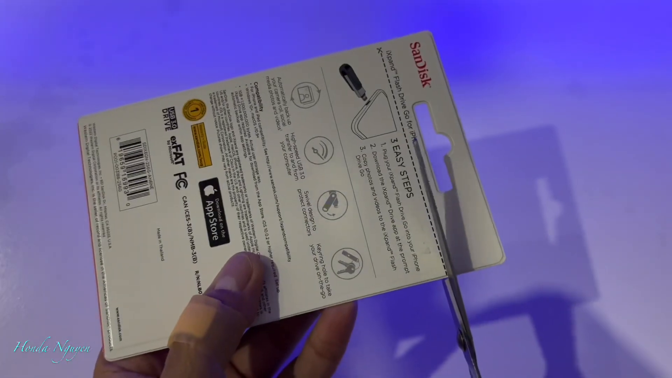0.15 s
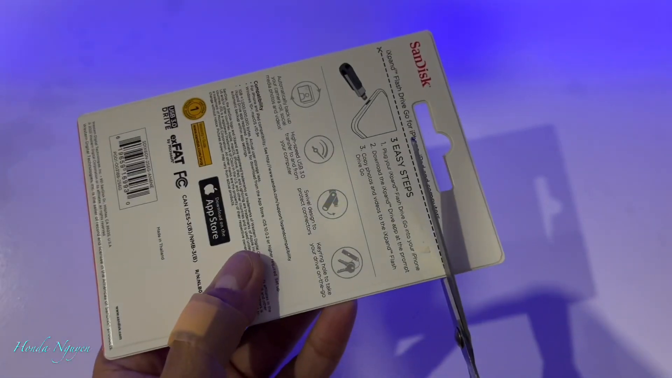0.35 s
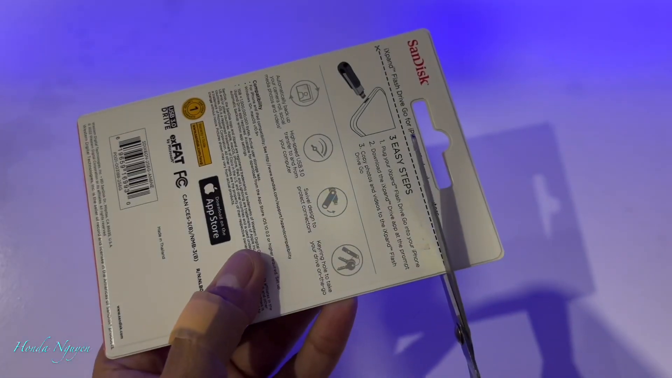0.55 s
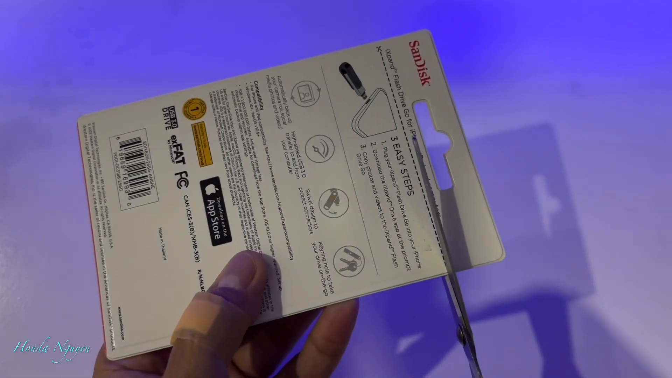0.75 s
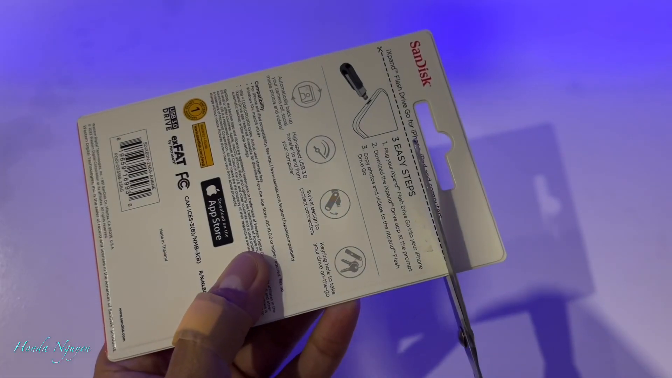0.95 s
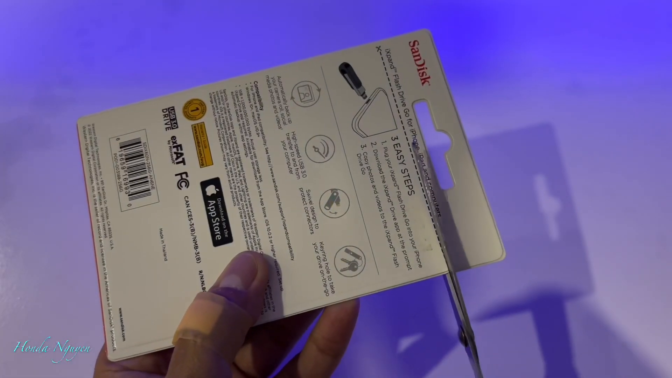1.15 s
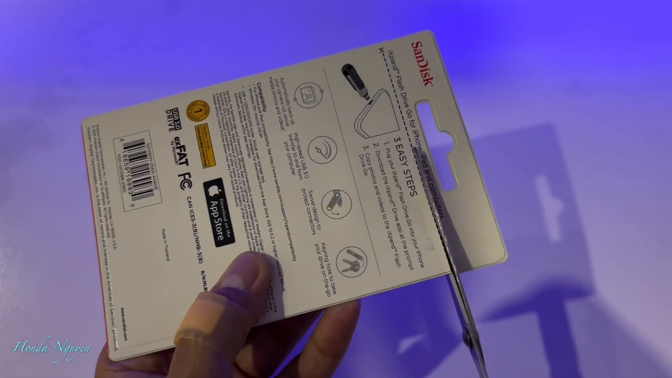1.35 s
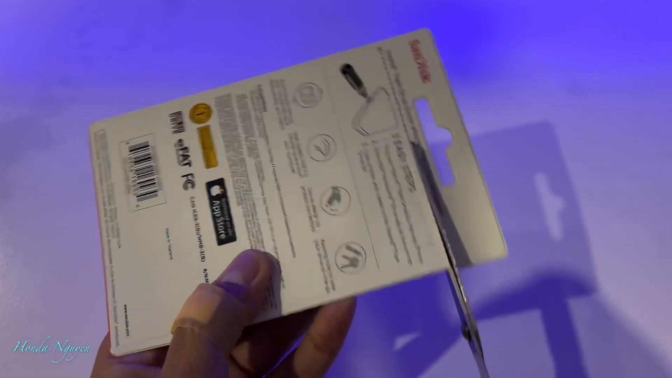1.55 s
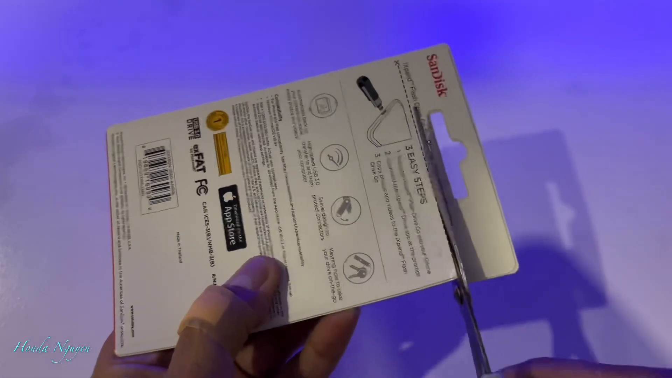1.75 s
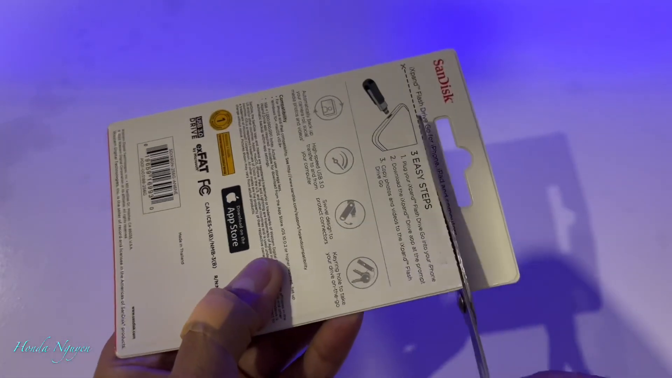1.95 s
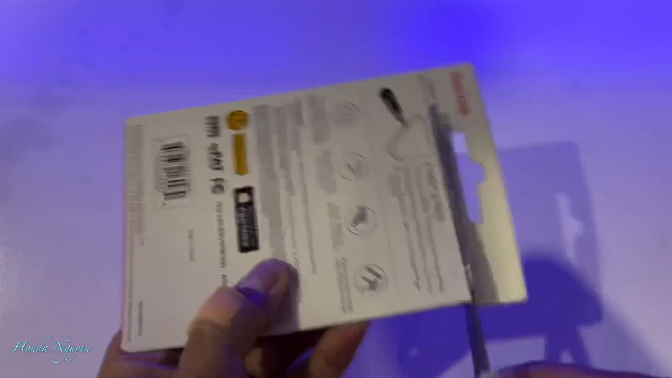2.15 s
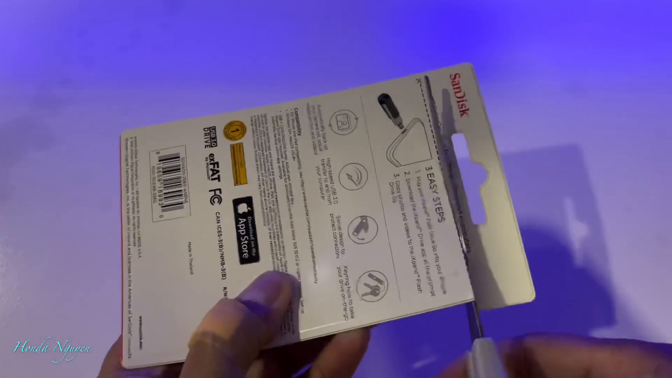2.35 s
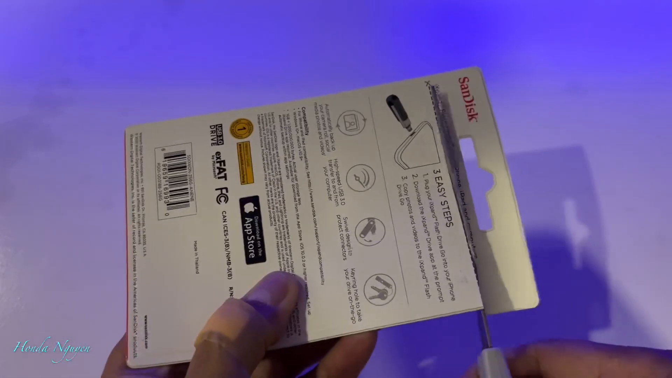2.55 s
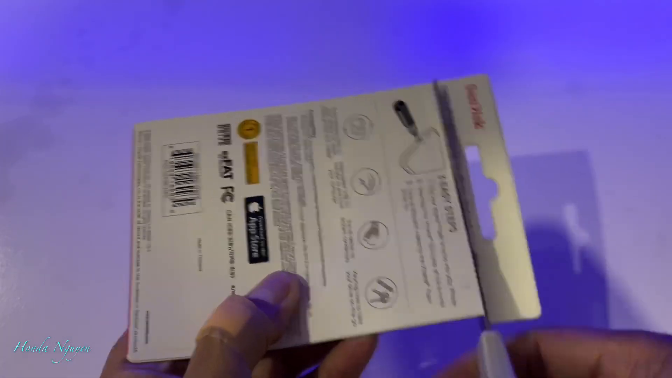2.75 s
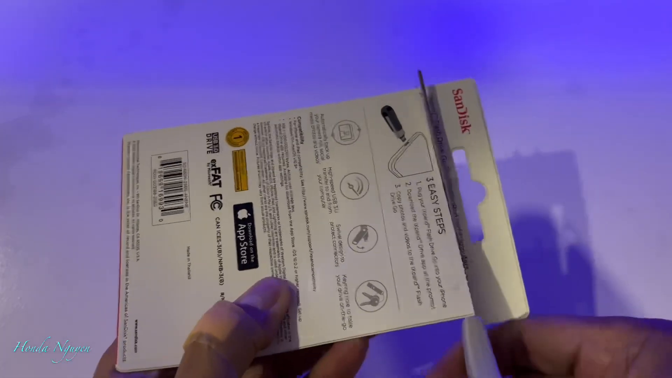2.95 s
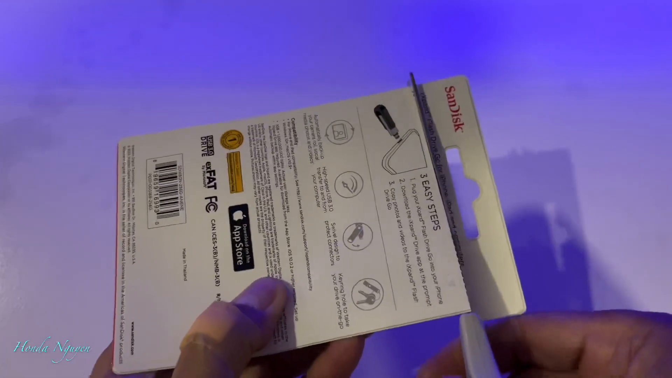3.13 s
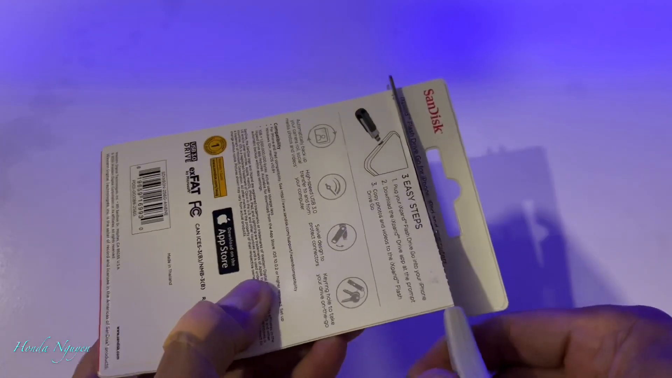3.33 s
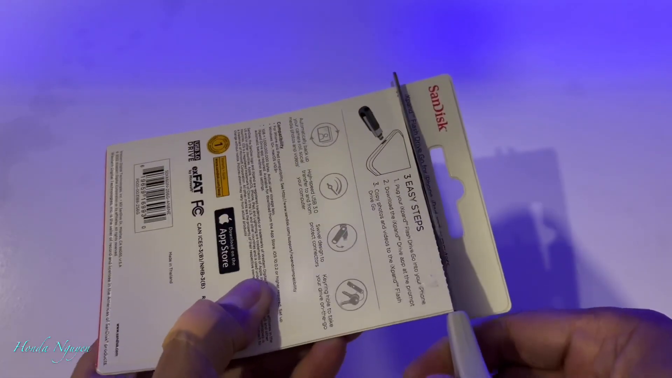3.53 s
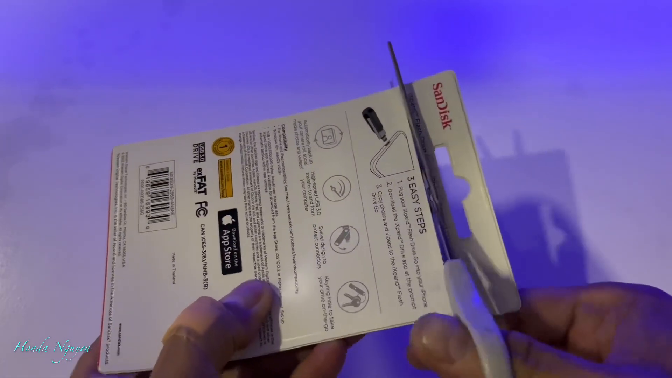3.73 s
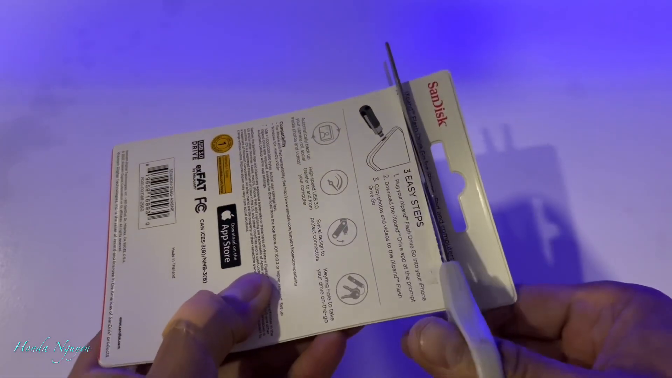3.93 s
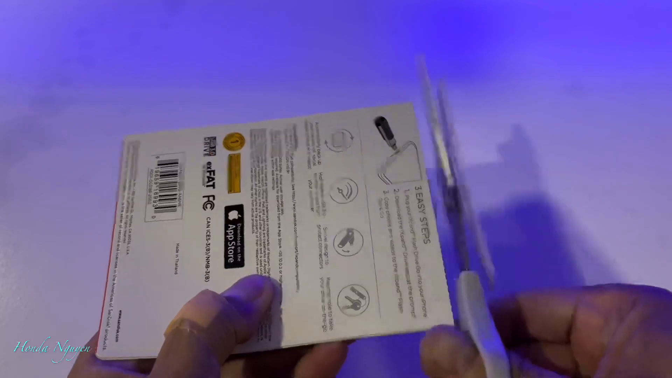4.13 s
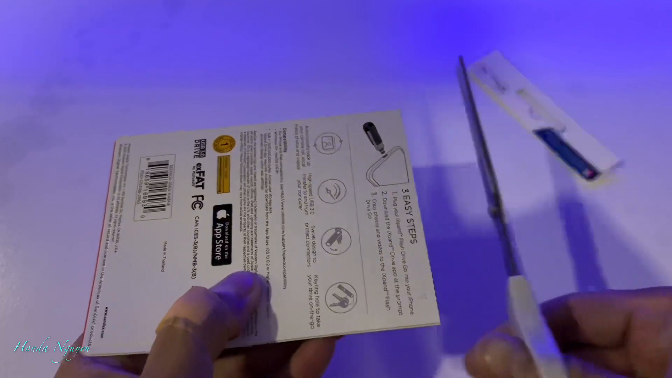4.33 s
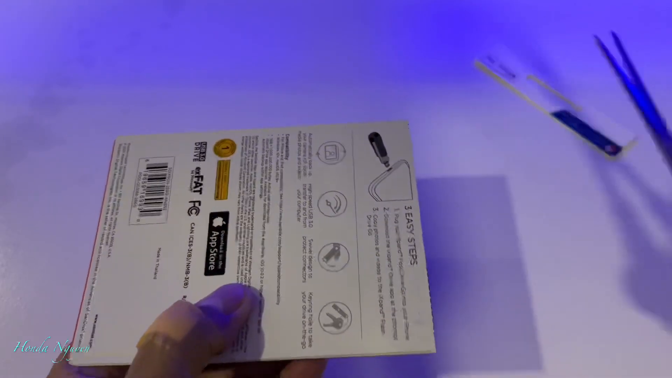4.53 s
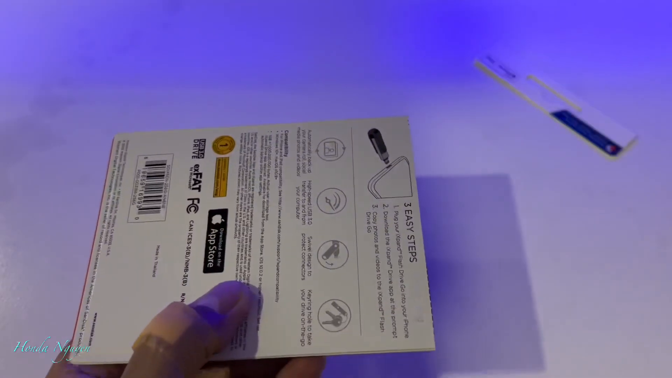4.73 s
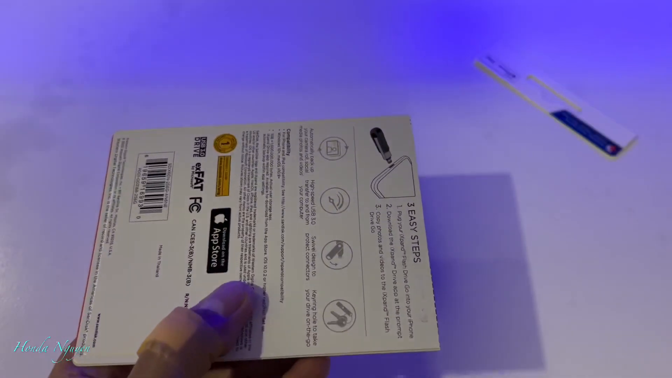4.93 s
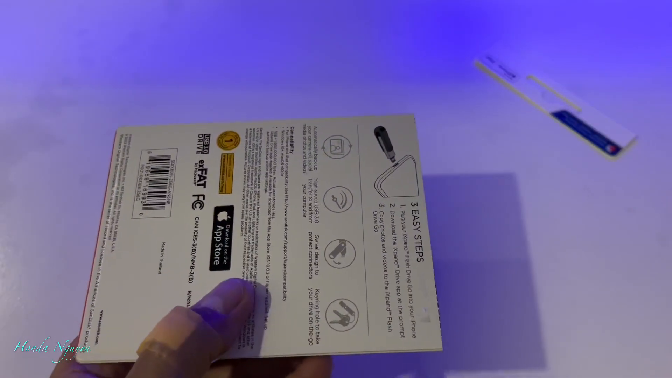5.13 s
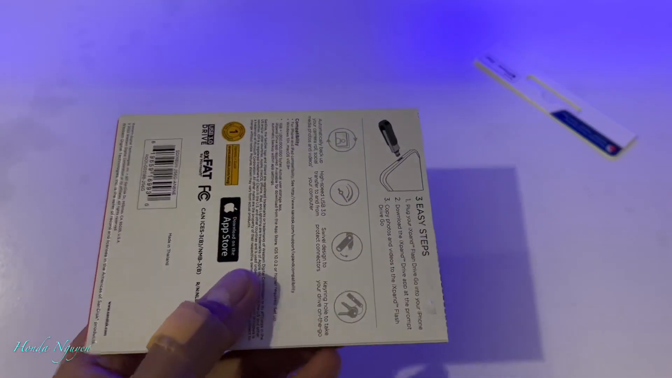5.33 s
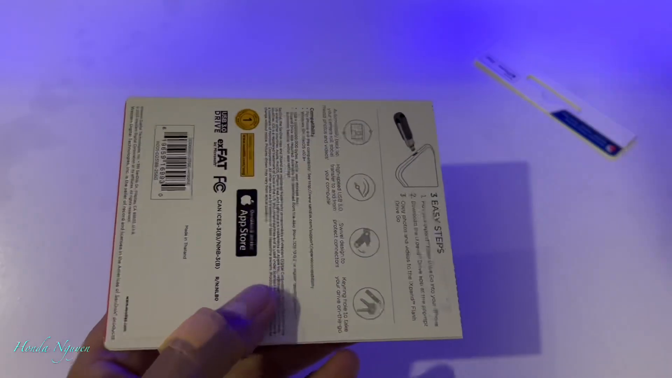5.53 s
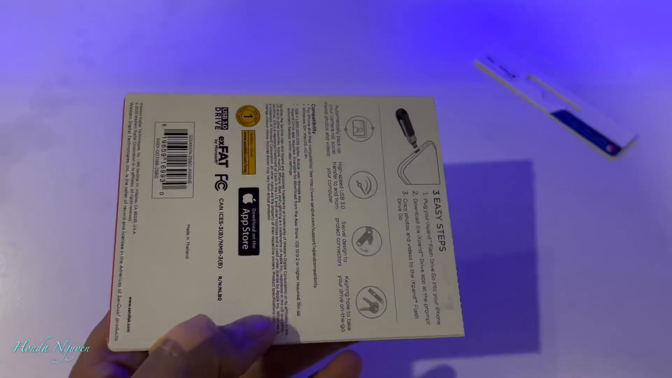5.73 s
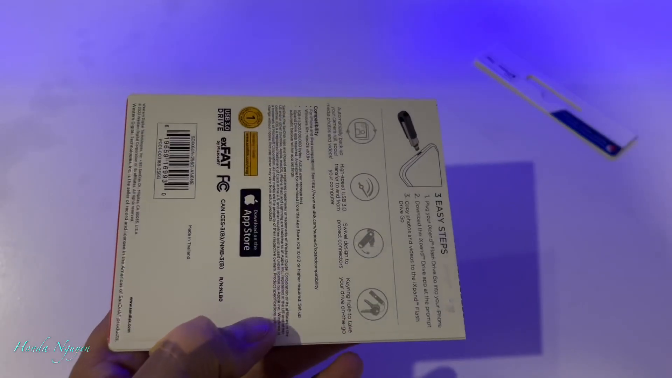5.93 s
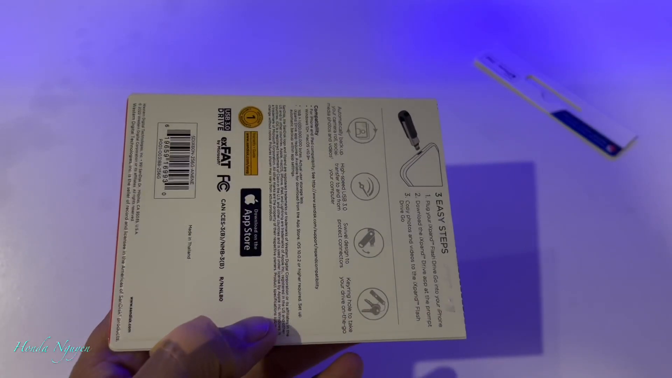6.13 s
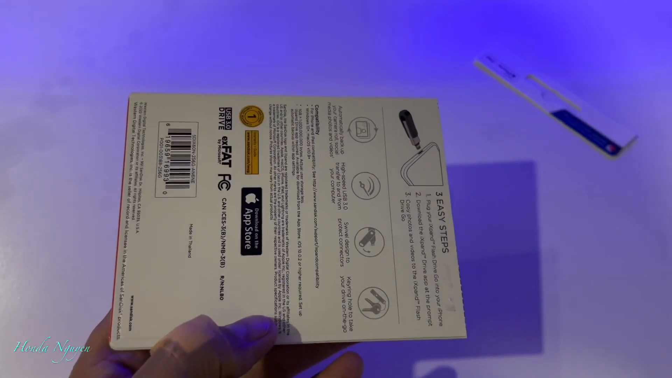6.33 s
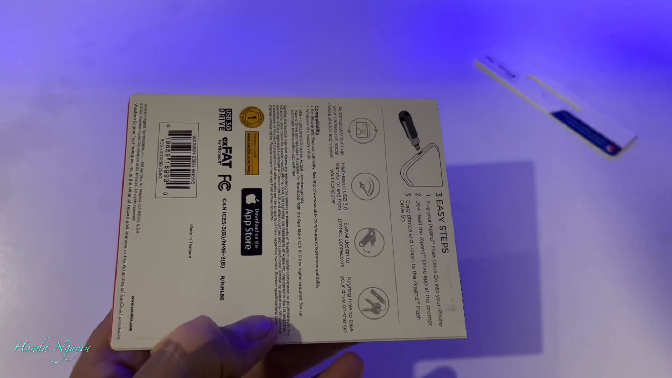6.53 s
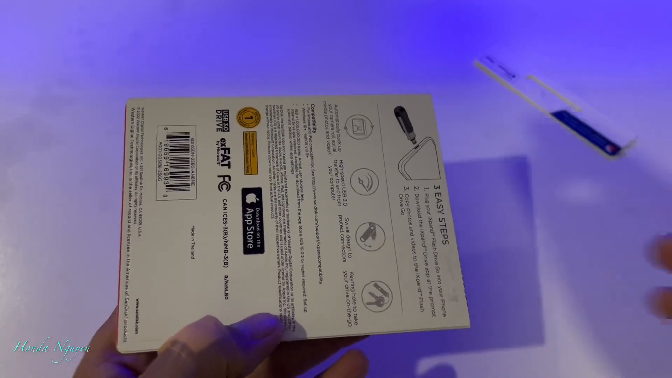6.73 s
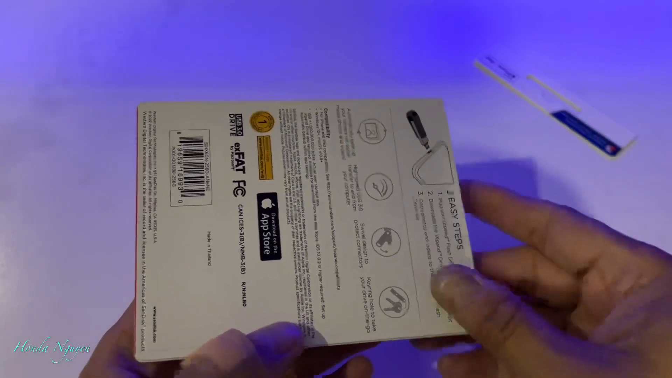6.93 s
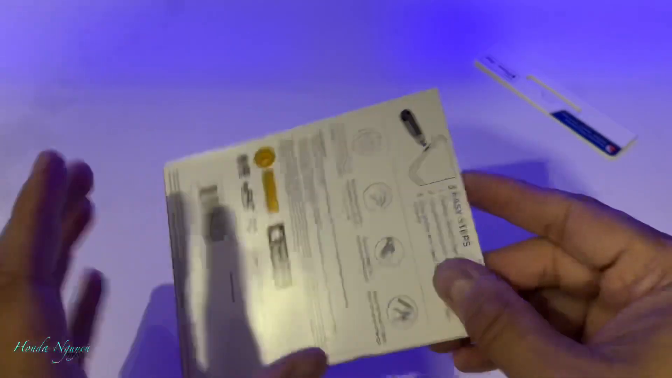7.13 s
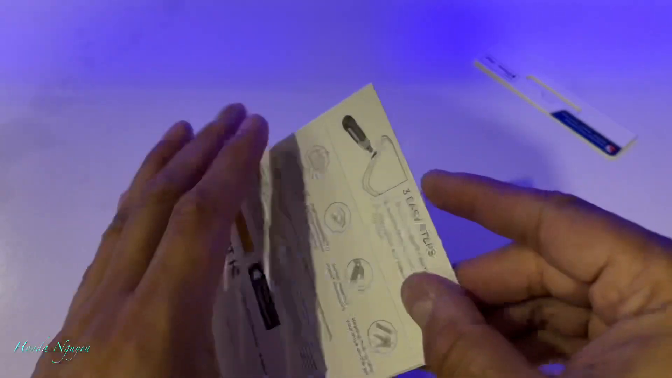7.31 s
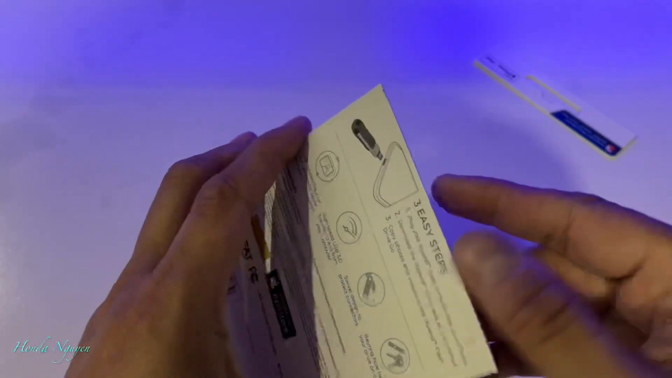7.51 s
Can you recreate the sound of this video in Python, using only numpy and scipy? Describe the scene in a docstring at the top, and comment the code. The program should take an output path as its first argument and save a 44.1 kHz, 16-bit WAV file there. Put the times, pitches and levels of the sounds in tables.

```python
"""In a hard small room, scissors work through a stiff card package: the blades slip and crackle, then snap shut.
The cut strip drops, the scissors are laid down and fingers tap the card. Contacts are noise bursts through
resonant bodies; the crackle is dense tiny cracks; knocks and pings are dying sines; a sparse tail is the room.
Underneath lie wavering appliance tones, room hiss, a low drone and an engine passing outside, the last two
built from unsteady gliding sines."""
import sys
import numpy as np
from scipy import signal
from scipy.io import wavfile
from scipy.ndimage import uniform_filter1d

SR = 44100
rng = np.random.default_rng(int(sys.argv[2]) if len(sys.argv) > 2 else 0)


def generate_wav(sig):
    """Save sig (samples, or channels by samples) to the path in sys.argv[1] as 16-bit PCM at SR."""
    pcm = np.round(np.clip(np.atleast_2d(sig).T, -1, 1) * 32767).astype(np.int16)
    wavfile.write(sys.argv[1], SR, pcm)


N = 333837  # length in samples
HZ = np.fft.rfftfreq(2048, 1 / SR)  # frequency grid for every colour

# Five contact tables: (time [s], level [dB], low at 900 Hz [dB], treble at 7.5 kHz [dB], middle at 2 kHz [dB],
# room send [dB]); the three colours are relative to the region near 5 kHz
# the blades slip through the card
SLIP_EVENTS = [(1.039, -46.5, -12, 3.5, -3, -1.5), (1.128, -41, 1, -3, -2, -6),
               (1.161, -44.5, -16, 2, -13, -12), (1.192, -36, -26, 7, 1, -15),
               (1.208, -46, -21, -3, -18, -12), (1.231, -39, -21, 4, -14, -13),
               (1.254, -37, -19, 5, 1, -5.5), (1.2765, -38, 1, -4, -8, -6), (1.303, -37, -6, .1, -19, -12),
               (1.3248, -34, -19, -10, -19, -11), (1.3454, -38, 3.5, -2, -22, -8),
               (1.3803, -39, -22, 3.5, -22, -7), (1.4653, -43.5, -4, -7, -7, -6),
               (1.516, -37, -11, 0.5, -21, -1), (1.52, -35, -18, -10, -14, 3),
               (1.6145, -41.5, -1, 3, -1.5, 0.3), (1.6315, -36, -7, 0, -19, -10),
               (1.7642, -32.5, -10, -5, -17, -12), (1.7742, -45, -5, 4, -7, -3),
               (1.821, -47, -13, 2.5, -2, -5), (1.868, -31.5, -5, 1, -8, -3.5), (1.907, -36, -9, 0, -5, -2),
               (1.926, -32.5, -11, 1, -13, -6), (1.942, -38, -14, -5, -15, -11),
               (1.9699, -25, -16, -2.1, -4, -9.5), (2.101, -28.5, -10, -3, -6, 2.2),
               (2.1284, -20, -10, -18, -14, -9), (2.1441, -23.5, 3.5, -13, -9, -12),
               (2.4815, -35.5, 12, 3.5, -8, -0.3), (2.4992, -33, 5, -2, -3, -1),
               (2.5227, -25.5, -4, -3.5, -8, -10), (2.5325, -22.5, -8, -10, -14, -15),
               (2.562, -33, 1, -1, 1, -12), (2.7, -33, -16, -2, -5.5, 3), (2.8819, -37, -25, 4, 1, -8.5),
               (2.9154, -35.5, 7.5, -1, -13, 2), (2.9343, -28.5, -10, -6, -11, -2.5),
               (2.9485, -25, -7, -3, -17, -12), (3.1187, -34, -14, -14, -13, -8),
               (3.459, -43.5, -7, -15, -3, -1.5), (3.5042, -43, -20, -8, -5, -9),
               (3.5217, -22, -15, -15.5, -9.5, -2.5), (3.5343, -23.5, -20.5, -8, -13, -5),
               (3.5463, -27.5, -5, -4, -0.5, -1.5), (3.5973, -24, -21, -19, -17, -14),
               (4.0202, -34.5, -20.5, 8.5, .1, -5), (4.054, -31, -1, -2, 2, -3.5)]
# the blades snap shut
SNAP_EVENTS = [(4.0823, -14.5, -18.5, -6, -13, -8), (4.0846, -1.5, -22.5, -5, -8.5, -9.5),
               (4.092, -16.5, -5, -10.5, 1, -12.5), (4.097, -16, -2.5, -13, 1.5, -3.5)]
# the strip hits the table and bounces
BOUNCE_EVENTS = [(4.2404, -6.5, -13, -12.5, -11.5, -5), (4.247, -17, -11.5, -4, -4.5, -13),
                 (4.26, -17, -30, 7, -24, -14), (4.2663, -15.5, -8.5, -7, -24, 0),
                 (4.2739, -17.5, -14, 4.5, -5.5, -6), (4.282, -22, -6, 2.5, -27, -7)]
# the scissors are laid down to one side
CLACK_EVENTS = [(4.784, -24.5, -14, -1, -7.5, .1), (4.7994, -31, 0, -22, -22.5, .1),
                (4.8249, -26.5, -31, -23, 4.5, .1), (5.012, -17, -13.5, -6.5, -2.5, 0.088),
                (5.0294, -32.5, -2.5, -24.5, 11.5, .1), (5.2255, -23, -8, -4, 9, .1),
                (5.2334, -28.5, -3.5, -14, -19, .1)]
# the card is tapped and flexed
TAP_EVENTS = [(0.188, -54.5, -17, 2.1, -3, -0.5), (3.1079, -39, 20, -11, 0.5, -10),
              (6.125, -49.5, 12.5, -9, -2.3, -16), (6.339, -53, -12, -2.7, -2, -1.5),
              (6.525, -53, 21, -12, 9, -19), (6.917, -45.5, -7, -2.5, -7, -4),
              (6.951, -28.5, 1.5, -7.5, -5, -3.5), (6.960, -37, 4.5, -11.5, -1.5, -8),
              (7.195, -51, 4, -17, 6, -5.5), (7.329, -49.5, -12, -25.5, 8.5, -1),
              (7.3479, -34.5, 2, -9, 5, -5.5), (7.356, -43.5, 9.5, -17, -8.5, -3),
              (7.551, -46, -8, 0, -1.1, 3), (7.562, -49, 12.5, -6, 5.5, 3)]

# Character of each contact: (450 Hz relative to low [dB], 12 kHz relative to treble [dB],
# left over right [dB], burst time scale [ms])
SLIP_KIND = -5.5, -5.5, -.6, 1.04
SNAP_KIND = -10, 3, -0.2, 1.36
BOUNCE_KIND = 2, -6.5, -0.6, 0.94
CLACK_KIND = 11.5, -7.5, 1.5, 0.71
TAP_KIND = -13, -4.5, 0, 1.24
SCATTER_DB = 0.5  # no two contacts have quite the same colour

# Resonances of each struck body: (frequency [Hz], width [Hz], strength over a flat base [dB])
CARD_MODES = [(647, 113, 3), (1222, 97, 3.5), (1780, 290, 2), (2622, 50, -17), (2890, 75, -10),
              (4376, 100, 1), (5160, 360, 1.5), (8440, 180, 4.5), (10040, 170, 5), (12400, 290, -40)]
BLADE_MODES = [(675, 130, 18), (1216, 87, 9.1), (1920, 200, 6), (2455, 670, 5.8), (4380, 470, 2.7),
               (4740, 340, 3.5), (5360, 370, 7.7), (6250, 150, 5), (8370, 290, 6.1), (10270, 2300, 5.6),
               (11020, 690, 9), (12300, 1700, 2)]
STRIP_MODES = [(1100, 190, 6.6), (1730, 410, 9.2), (2830, 250, 3), (3700, 160, 2.2), (5030, 300, 6),
               (5500, 220, 6.1), (6700, 224, 1.8), (7930, 730, 5.1), (9500, 1400, 2)]
HANDLE_MODES = [(434, 43, 5.7), (608, 190, 8.9), (1092, 100, 12.1), (1673, 46, 5.8), (1847, 130, 3.3),
                (2305, 140, 4.1), (2666, 150, 6.7), (3186, 130, 2.5), (4330, 260, 4.5), (5100, 174, 3.9),
                (6400, 58, 2.3), (6900, 39, 2.1)]

# Strokes of the blades: (start [s], rise [s], hold [s], level before halving [dB],
# then relative to the middle: low body [dB], blade rasp [dB], top [dB])
BLADE_STROKES = [(1.03, .09, .06, -62.5, -3, 2, 7), (1.18, .03, 0.13, -56.5, -1.3, 3.5, 9),
                 (1.509, 0.0089, 0.092, -55, -0.5, -4, 4), (1.855, 0.024, 0.099, -48, 1, -17, -2),
                 (2.082, .022, 0.026, -42.5, -4.5, -10, -3.5), (2.14, .004, 0.01, -48, 7.5, -14, -9),
                 (2.469, 0.045, .02, -45, 6, -6, -2), (2.695, 0.014, 0.01, -44.5, 2.5, -14, -4),
                 (2.875, 0.062, 0.0068, -44, -2, -12, 0), (3.108, 0.0052, .005, -55, 13, -24, -8),
                 (3.44, 0.0083, 0.043, -60.5, -3, -13, -13), (3.512, .009, .025, -43, -1, -18, -2.5),
                 (4.02, .004, .012, -50.5, 1, -6.5, 2), (4.049, .005, .022, -46, -0.5, -1, -3)]
RISE_DB, RELEASE_DB_PER_S = 16.5, 269.5  # the crackle swells, holds, then dies as the blades stall
RASP_HZ, RASP_SAG_HZ_PER_S = 4320, 4900  # the rasp sinks while the blades close

# Low knocks, and at 3.25 s a brief swell of the hum near 120 Hz:
# (time [s], level [dB], settled pitch [Hz], T60 [s], starting pitch [factor])
LOW_SWINGS = [(2.099, -33, 109.3, 0.049, 1.4), (2.143, -28.5, 92.5, 0.096, 4.8), (2.17, -48, 72, 0.53, 1.7),
              (2.759, -46, 70.3, 0.39, 1.42), (3.25, -43, 121.6, 1, 1.5), (4.084, -27, 112.5, 0.12, 3.1),
              (4.11, -44.5, 72, .51, 0.97), (4.152, -20.5, 298, 0.033, 0.97),
              (4.247, -33.5, 321, 0.099, 0.93), (4.267, -36, 269, 0.12, 0.9), (4.786, -42, 110, 0.18, 1.3),
              (5.022, -44, 220, 0.24, 1.3), (6.1252, -21.5, 59, 0.18, 4.1)]
# Brief pings some blows leave in the card: (time [s], level [dB], settled pitch [Hz], T60 [s],
# starting pitch [factor])
CARD_PINGS = [(2.15, -37, 540, 0.068, 0.89), (2.53, -40.5, 693, 0.16, 1), (3.109, -47, 722, 0.14, 0.97),
              (4.086, -34, 1250, .07, 1), (4.087, -32, 663, 0.062, 1), (4.150, -38.5, 500, 0.068, 0.98),
              (6.5248, -53, 2540, .08, 0.93), (6.5246, -56.5, 1300, 0.051, 1),
              (6.951, -46, 1140, 0.15, 0.99), (7.3503, -47, 1820, 0.045, 0.97)]

# Room decay: (frequency [Hz], T60 [s])
ROOM_DECAY = [(200, 0.6), (1000, 0.41), (3000, 0.46), (6000, 0.34), (12000, 0.31)]
# Engine outside: (time [s], firing rate [Hz])
ENGINE_RATE = [(1.45, 85.9), (1.62, 84.5), (1.85, 89.5), (2.1, 84.4), (2.3, 83), (2.47, 89), (2.72, 88),
               (2.98, 84), (3.25, 81.9), (3.7, 81.9), (4.05, 83.4)]
# Swell of each engine order, {order: [(time [s], level [dB])]}
ENGINE_SWELLS = {3: [(1.45, -66), (1.9, -60), (2.3, -57), (2.55, -67.5), (3.0, -59), (3.3, -58.5),
                 (4.05, -67)], 4: [(1.45, -76), (2.25, -68), (2.45, -58), (2.75, -59), (2.95, -47),
                 (3.2, -57.5), (3.55, -56), (4.05, -68.5)], 5: [(2.6, -85), (3.02, -48), (3.25, -62.5),
                 (3.7, -76), (4.05, -60)]}
# Low unsteady drone that rises, then sinks, on its own pitch curve: (time [s], pitch [Hz], level [dB])
DRONE_CURVE = [(0.95, 52.1, -80), (1.26, 64.1, -63), (1.6, 72, -66), (2.2, 77, -72), (2.6, 88, -60),
               (3.0, 81.5, -59.5), (3.6, 77, -63), (3.95, 82.5, -68), (4.45, 64, -77), (5.33, 55, -63.5),
               (5.7, 47.3, -81)]
# Appliance tones: (frequency [Hz], level [dB])
HUM_TONES = [(106, -64.5), (119, -61.5), (142, -79.5), (177, -70), (210, -69.5), (242, -67), (360.7, -67)]
# Colour of the room hiss and rumble: (frequency [Hz], relative level [dB])
AIR_COLOUR = [(21, -86.5), (35, -15.5), (80, -16.5), (100, -5.5), (123, -3), (168, -4.5), (212, -7),
              (320, -13), (354, -14), (446, -20), (577, -20.5), (1160, -27.5), (7550, -33), (15300, -37.5),
              (16000, -56)]
AIR_DB = -57.5  # overall rms level
# Left-right likeness of the air: (frequency [Hz], likeness [-1 to 1])
AIR_LIKENESS = [(40, 0.97), (80, 1), (150, 0.79), (400, 0.69), (1650, 0.58), (5000, 0.7), (15000, 0.98)]
EDGE_HZ = 16300  # upper band limit


def slips():
    """The card slips between the blades and rings at its own resonances."""
    return clicks(SLIP_EVENTS, CARD_MODES, SLIP_KIND)


def shear(cracks_per_s=4000, spread_db=2.5, rasp_width_hz=600):
    """Dense tiny cracks of uneven size, heard through the card, its low body and the rasp of the blade."""
    cracks = gain_of(spread_db * np.minimum(rng.exponential(1, N), 3)) * (rng.random(N) < cracks_per_s / SR)
    cracks = evened(cracks * rng.standard_normal(N)) * gain_of(3.44 * drift(78))

    # colour curves: (frequency [Hz], gain [dB])
    middle_curve = [(700, -67), (2500, 7), (5000, -1), (8000, -6), (16000, -46)]
    low_curve = [(300, -12.5), (650, -4.5), (1200, -5.5), (2200, -21.0), (6000, -71)]
    top_curve = [(4000, -20.5), (8000, 15.0), (11000, 14.5), (16000, -6.5)]
    card = body_gain(CARD_MODES)
    middle, low, top = (evened(coloured(cracks, card * gain_of(read(curve, HZ)))[:N])
                        for curve in (middle_curve, low_curve, top_curve))

    # each sample follows the latest stroke
    strokes, t = np.array(BLADE_STROKES), np.arange(N) / SR
    latest = np.maximum(np.searchsorted(strokes[:, 0], t) - 1, 0)
    start, rise, hold, db, low_db, rasp_db, top_db = strokes[latest].T
    since = t - start
    db = db - RISE_DB * np.clip(1 - since / rise, 0, 1)
    db = db - RELEASE_DB_PER_S * np.maximum(since - rise - hold, 0)

    rasp_hz = RASP_HZ - RASP_SAG_HZ_PER_S * np.clip(since - rise, 0, .3)
    rasp = resonate(cracks, rasp_hz, rasp_width_hz)
    rasp = evened(resonate(rasp, rasp_hz, rasp_width_hz))
    blend = middle + gain_of(low_db) * low + gain_of(rasp_db) * rasp + gain_of(top_db) * top
    return (since > 0) * gain_of(db) / 2 * blend


def snaps():
    """Closing blades strike each other and excite the metal's resonances."""
    return clicks(SNAP_EVENTS, BLADE_MODES, SNAP_KIND)


def bounces():
    """The dropped strip strikes the table in quick succession, sounding its own resonances."""
    return clicks(BOUNCE_EVENTS, STRIP_MODES, BOUNCE_KIND)


def clacks():
    """The scissors land and their handles resonate."""
    return clicks(CLACK_EVENTS, HANDLE_MODES, CLACK_KIND)


def taps():
    """Taps and flexes set the card's resonances going."""
    return clicks(TAP_EVENTS, CARD_MODES, TAP_KIND)


def clicks(rows, modes, kind, apart=0.75):
    """Each click is a short burst through the struck body; returns the direct pair and the feed to the room."""
    near, feed, t = np.zeros((2, N)), np.zeros(N), np.arange(900) / SR
    bass_db, top_db, pan_db, ms = kind
    noise = rng.standard_normal((len(rows), 3, len(t)))
    scatter = SCATTER_DB * rng.standard_normal((len(rows), 3))
    ring = body_gain(modes) * gain_of(1.0)
    u = t * 1000 / ms
    envelope = np.sqrt(u) * np.exp(-.6 * u)
    size = np.sqrt(ms * SR / 1000)  # energy grows with length
    sides = gain_of([[pan_db / 2], [-pan_db / 2]])
    for row, (both, left, right), (a, b, c) in zip(rows, noise, scatter):
        s, db, low, treble, middle, room_db = row
        points = [(150, low + bass_db - 20), (450, low + bass_db + a), (900, low), (2000, middle + b),
                  (4700, 0.00022), (7500, treble), (12000, treble + top_db + c),
                  (14000, treble + top_db - 5.5), (16000, treble + top_db - 13)]
        body = coloured(np.ones(1), gain_of(db + read(points, HZ)) * ring)
        burst = (both + apart * np.array([left, right])) * envelope
        burst *= size / np.linalg.norm(burst, axis=1)[:, None]
        add(near, s, signal.fftconvolve(burst, body[None], axes=1) * sides)
        add(feed, s, size * body * gain_of(room_db))
    return near, feed


def low_swings():
    """Low knocks, and at 3.25 s a brief swell of the hum near 120 Hz, all as dying sines."""
    return swings(LOW_SWINGS)


def pings():
    """Brief pings: higher dying swings in the card."""
    return swings(CARD_PINGS)


def swings(rows):
    """Each dying sine glides from its starting to its settled pitch, slightly out of step left to right."""
    out, t = np.zeros((2, N)), np.arange(SR // 2) / SR
    for s, db, hz, t60, start in rows:
        pitch = hz * (1 + (start - 1) * np.exp(-t / 0.0054))
        swing = -np.sin(2 * np.pi * np.cumsum(pitch) / SR + np.array([[.3], [-.3]]))
        onset = 1 - np.exp(-t * hz * 2.0)
        add(out, s, gain_of(db - 60 * t / t60) * swing * onset)
    return out


def room(x, alike=0.56):
    """Three sparse tails, fed in turn so that like clicks do not ring alike."""
    out, turn = np.zeros((2, N)), np.arange(N) / SR * 2 * np.pi * 3.1
    for k in range(3):
        taps = np.zeros((2, 30000))
        at = np.arange(100, 29980, 20) + rng.integers(0, 20, (2, 1494))
        np.put_along_axis(taps, at, rng.choice([-1., 1.], at.shape), 1)
        taps[1] = alike * taps[0] + np.sqrt(1 - alike ** 2) * taps[1]
        # each band dies at its own rate
        hz, t, z = signal.stft(taps, SR, nperseg=256)
        decay = gain_of(-60 * t / read(ROOM_DECAY, hz)[:, None])
        tail = signal.istft(z * decay, SR, nperseg=256)[1]
        # reflections take a moment to pile up
        tail *= 1 - 0.37 * np.exp(-np.arange(tail.shape[1]) / SR / 0.0053)
        tail /= np.linalg.norm(tail[0])
        share = np.sqrt(2 / 3) * np.cos(turn + k * 2 * np.pi / 3)
        out += signal.oaconvolve((x * share)[None], tail, axes=1)[:, :N]
    return out


def engine():
    """Low orders, whole multiples of the firing rate, each swelling and fading as the engine passes."""
    s, hz = np.transpose(ENGINE_RATE)
    return sum(tone(s, k * hz, *np.transpose(swell), k * .22) for k, swell in ENGINE_SWELLS.items())


def drone():
    """One low unsteady sine that rises, then sinks, on its own pitch curve."""
    s, hz, db = np.transpose(DRONE_CURVE)
    return tone(s, hz, s, db, .6)


def hum(waver_db=3, wavers_per_s=8):
    """Appliance tones whose level and phase waver quickly and irregularly."""
    out, t = np.zeros(N), np.arange(N) / SR
    for hz, db in HUM_TONES:
        level = gain_of(db + waver_db * drift(wavers_per_s))
        out += level * np.sin(2 * np.pi * hz * t + .8 * drift(7.5))
    return out


def air():
    """Room hiss and rumble from random short-time spectra, with soft patches of level."""
    a, b, c, d, patches = rng.standard_normal((N // 512 + 5, 1025, 5)).T
    patches = evened(uniform_filter1d(uniform_filter1d(patches, 12, 0), 10, 1))
    same = np.clip(read(AIR_LIKENESS, HZ), -1, 1)[:, None]
    left = a + 1j * b
    right = same * left + np.sqrt(1 - same ** 2) * (c + 1j * d)
    z = np.array([left, right]) * gain_of(read(AIR_COLOUR, HZ)[:, None] + patches)  # patches: 1 dB rms
    hiss = signal.istft(z, nperseg=2048, noverlap=1536)[1][:, :N]
    return gain_of(AIR_DB) * evened(hiss)


def tone(s, hz, at, db, lead):
    """An unsteady sine on a pitch curve and a level curve; the left channel leads by some radians."""
    t = np.arange(N) / SR
    pitch = np.interp(t, s, hz) * (1 + 0.0044 * drift(11))
    turn = 2 * np.pi * np.cumsum(pitch) / SR + np.array([[lead], [0]])
    fade = np.interp(t, [at[0] - .15, at[0], at[-1], at[-1] + 0.1], [0, 1, 1, 0])
    level = gain_of(np.interp(t, at, db) + 2.5 * drift(45) + 1.7 * drift(8))
    return fade * np.sqrt(2) * level * np.sin(turn)


def body_gain(modes):
    """Gain of a struck body: resonances over a flat base."""
    return np.sqrt(1 + sum(gain_of(db) ** 2 / (1 + (2 * (HZ - f) / w) ** 2) ** 2 for f, w, db in modes))


def resonate(x, hz, width):
    """Moving resonance: shifts the curve hz down to zero, smooths, and shifts back."""
    turn, r = np.exp(2j * np.pi * np.cumsum(hz) / SR), np.exp(-np.pi * width / SR)
    return 2 * (turn * signal.lfilter([1 - r], [1, -r], x / turn)).real


def coloured(x, gain):
    """Causal minimum-phase filter with the given gain on 1025 bins."""
    log = np.log(np.maximum(np.r_[gain, gain[-2:0:-1]], 1e-5))
    impulse = np.fft.ifft(np.exp(np.conj(signal.hilbert(log)))).real[:1024]
    return signal.oaconvolve(x, impulse)


def drift(hz):
    """Random wander of rms 1, twice smoothed over 1 / hz seconds."""
    size = int(SR / hz)
    return evened(uniform_filter1d(uniform_filter1d(rng.standard_normal(N), size), size))


def read(points, hz):
    """Reads a curve as straight lines on a log-frequency axis."""
    f, value = np.transpose(points)
    return np.interp(np.log(hz + 1), np.log(f + 1), value)


def evened(x):
    """Scales to rms 1."""
    return x / np.sqrt(np.mean(x ** 2) + 1e-20)


def gain_of(db):
    """Decibels to amplitude."""
    return 10 ** (np.asarray(db) / 20)


def add(mix, s, sound):
    """Mixes a sound in at a time in seconds."""
    part = mix[..., round(s * SR):][..., :sound.shape[-1]]
    part += sound[..., :part.shape[-1]]


def scene():
    """Contacts and crackle with their room, over the engine, drone, hum and air."""
    contacts = slips(), snaps(), bounces(), clacks(), taps()
    near, feed = (sum(parts) for parts in zip(*contacts))
    crackle = shear()
    wet = room(gain_of(4.0) * feed + gain_of(-2.5) * crackle) * gain_of([[.2], [-.2]])
    foreground = near + crackle + wet + low_swings() + pings()
    background = engine() + drone() + hum() + air()
    return (foreground + background) * gain_of([[-.4], [.4]])  # leans slightly right


def record(dry):
    """The microphone loses the deepest bass; then the band limit."""
    dry = signal.sosfilt(signal.butter(2, 42, "high", fs=SR, output="sos"), dry)
    lowpass = signal.firwin(511, EDGE_HZ, window=("kaiser", 9), fs=SR)
    return signal.oaconvolve(dry, lowpass[None], "same")


dry = scene()
out = record(dry)
generate_wav(out)
```